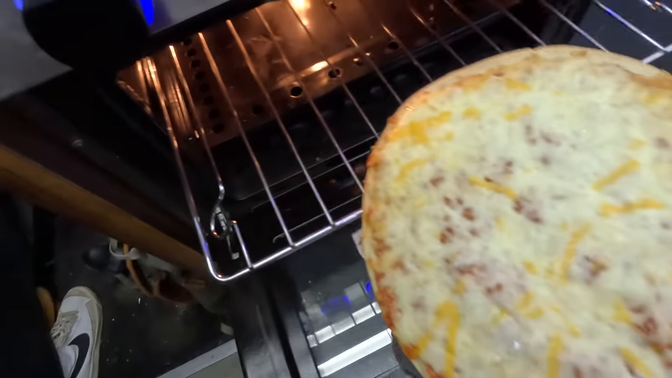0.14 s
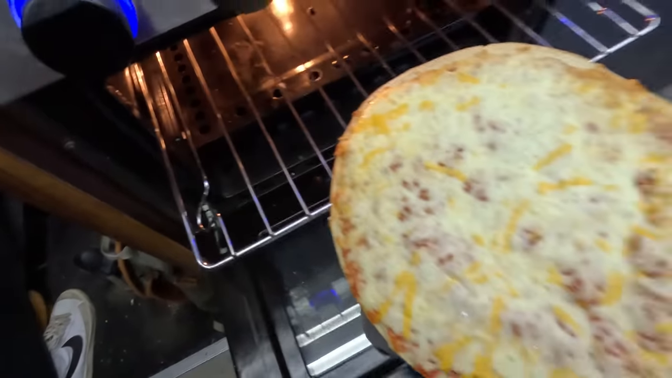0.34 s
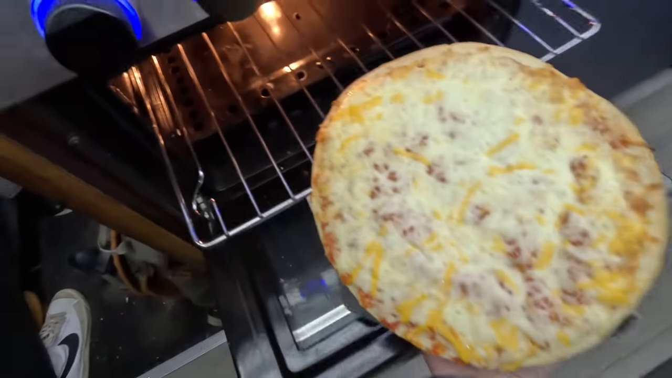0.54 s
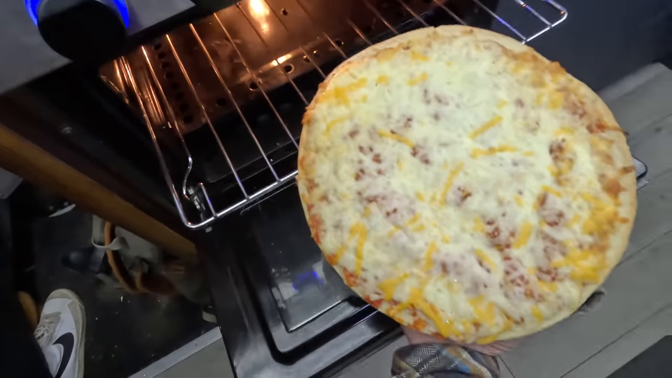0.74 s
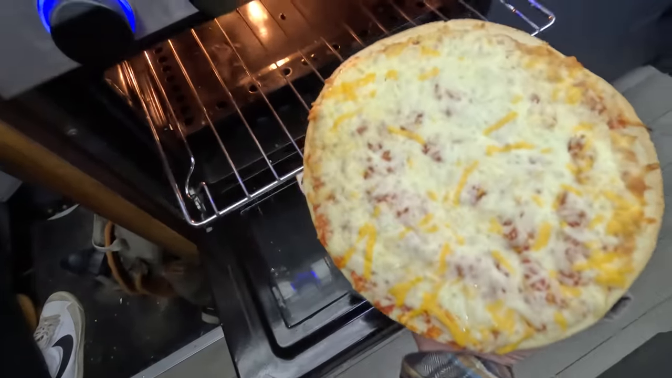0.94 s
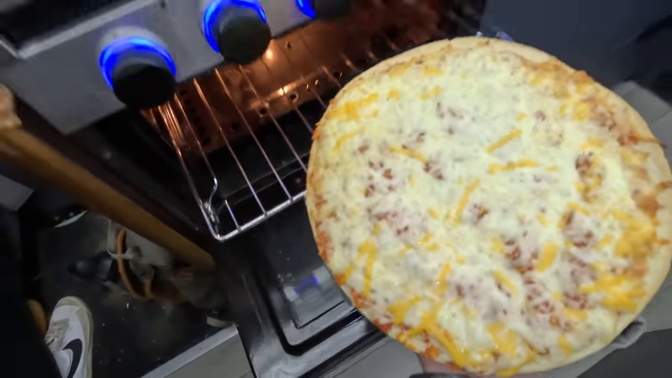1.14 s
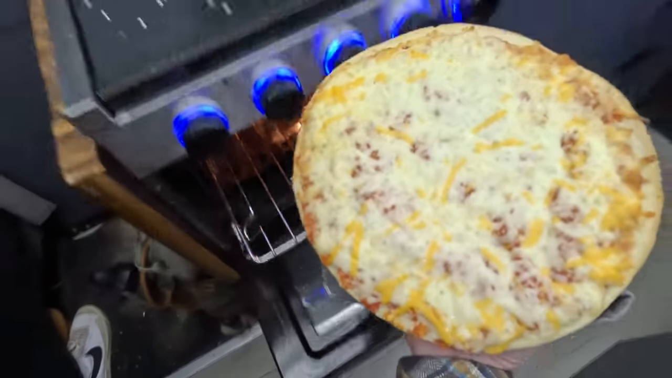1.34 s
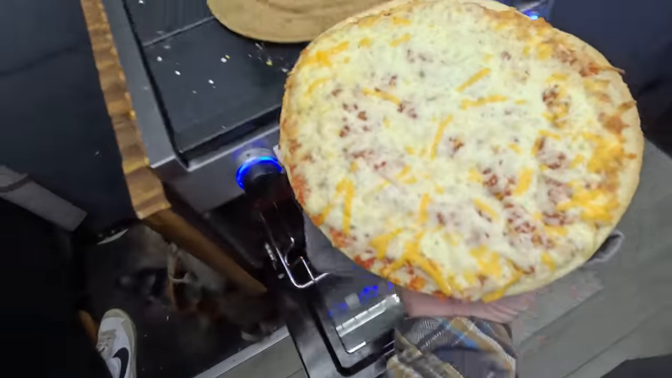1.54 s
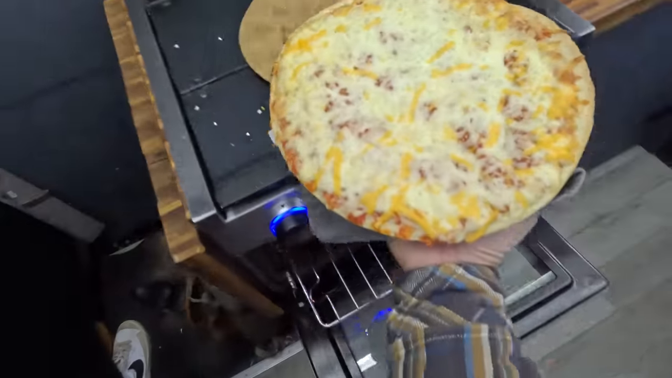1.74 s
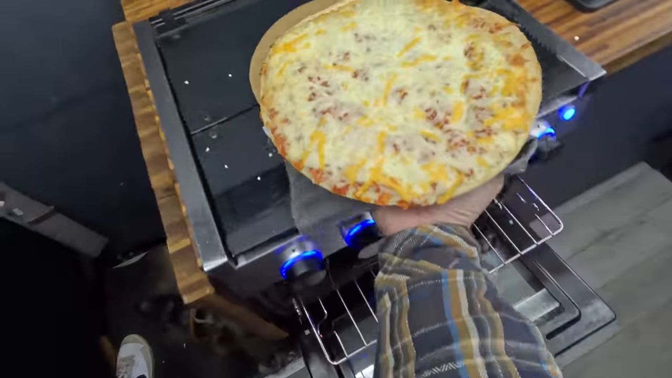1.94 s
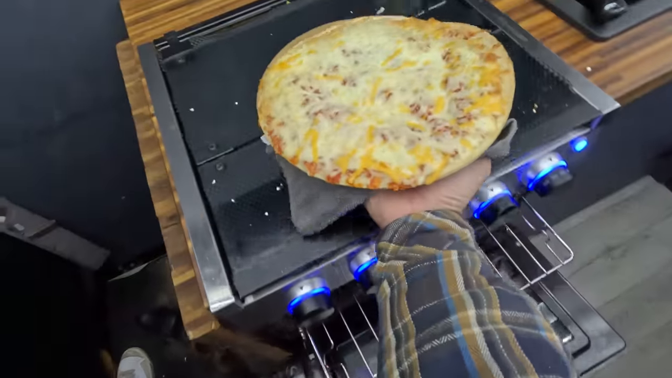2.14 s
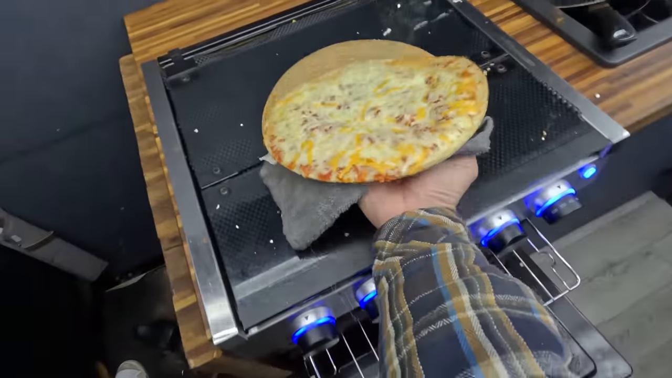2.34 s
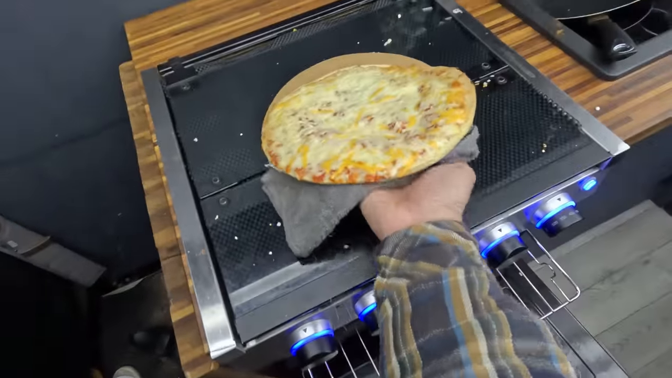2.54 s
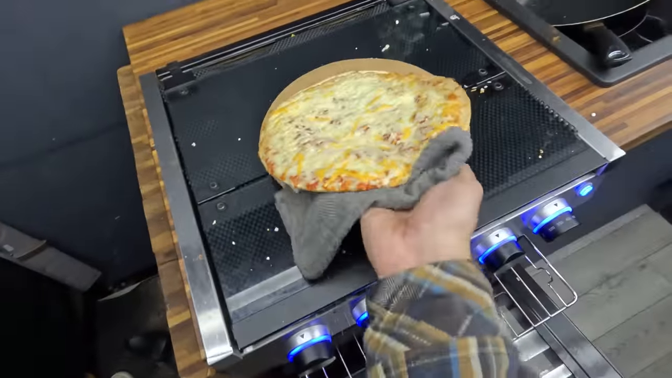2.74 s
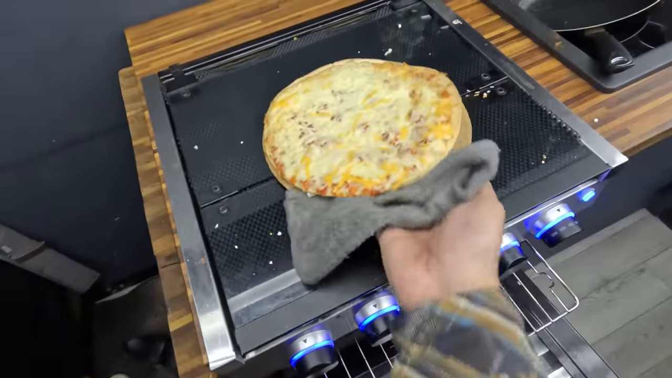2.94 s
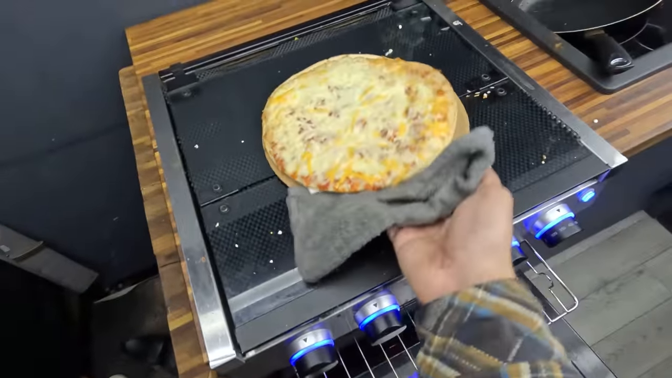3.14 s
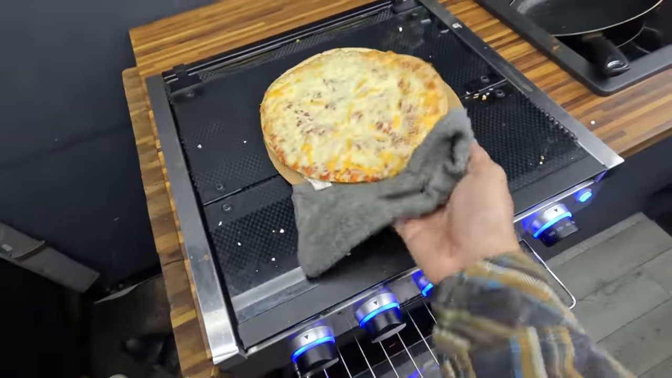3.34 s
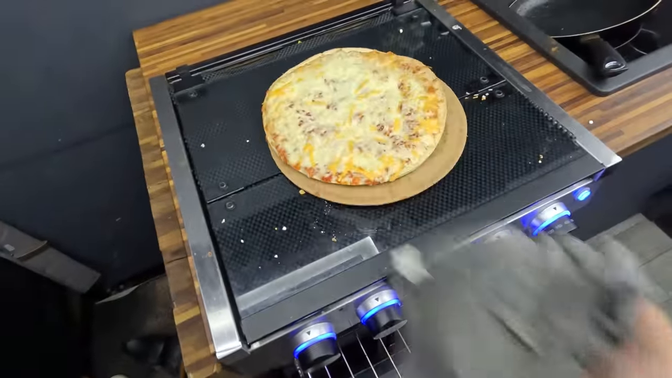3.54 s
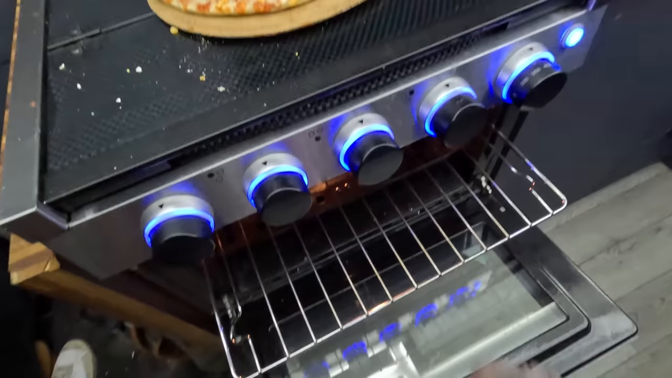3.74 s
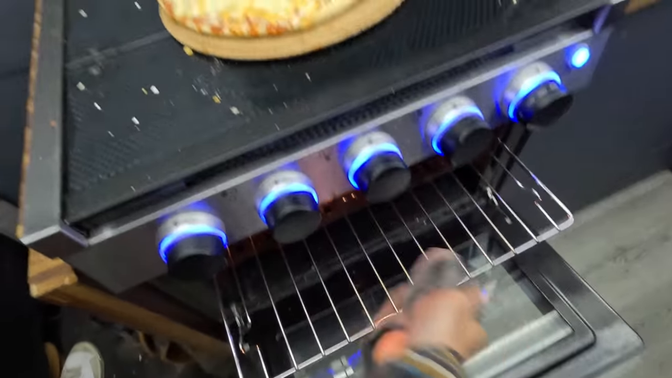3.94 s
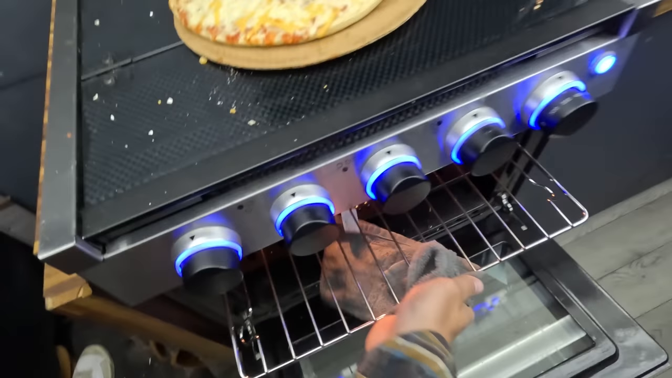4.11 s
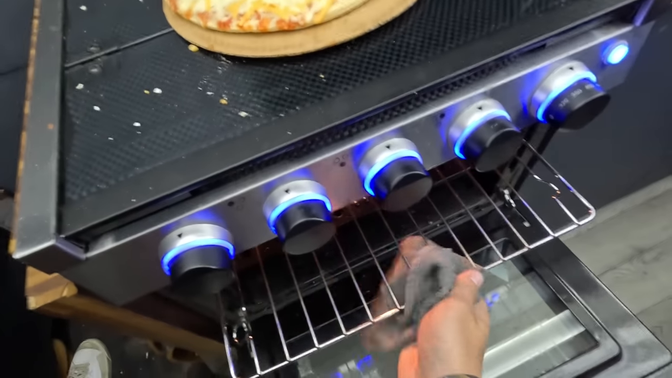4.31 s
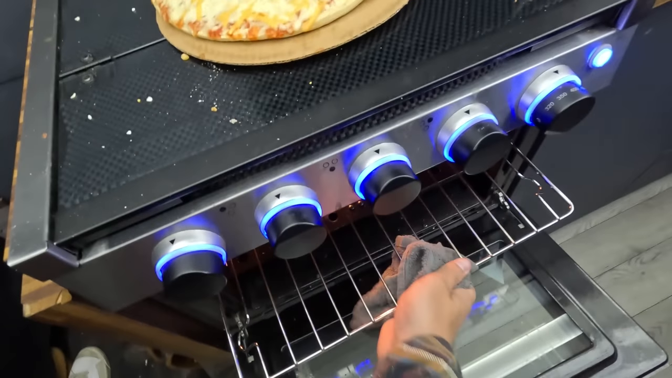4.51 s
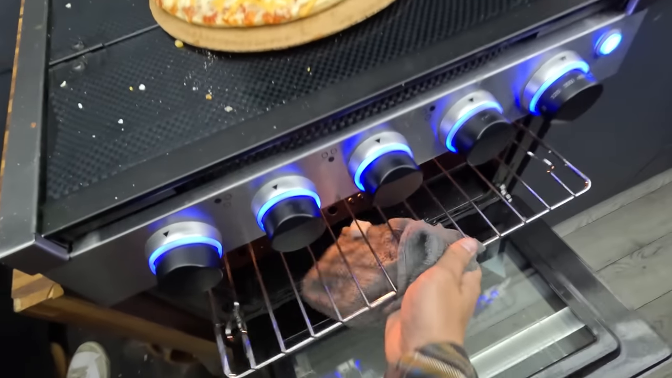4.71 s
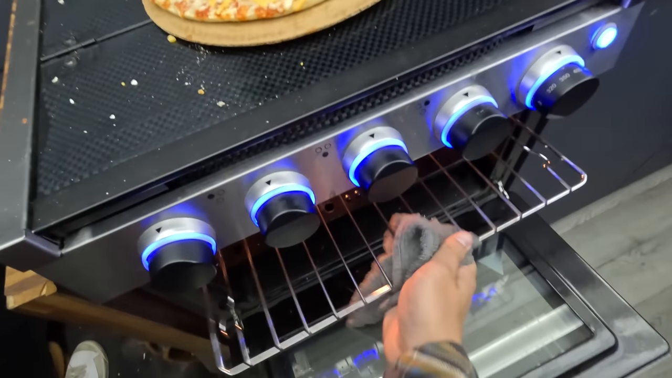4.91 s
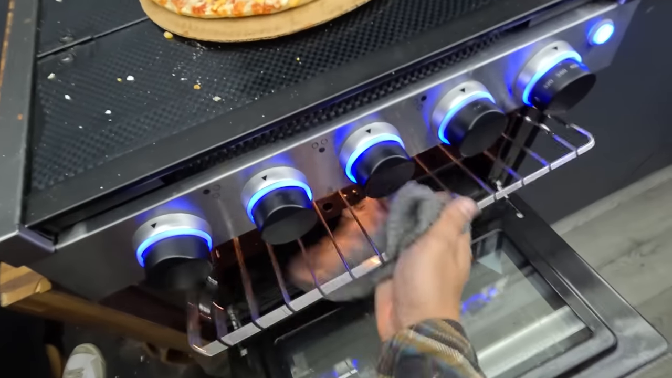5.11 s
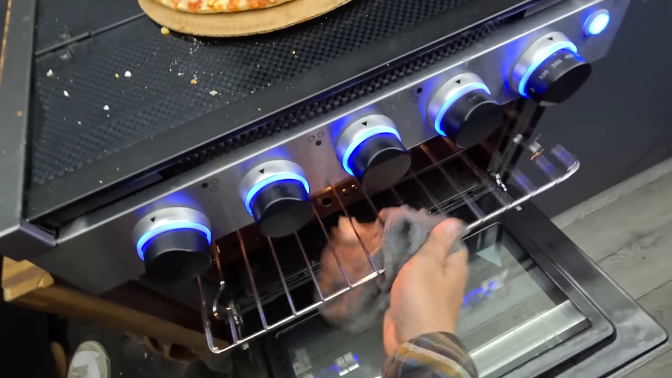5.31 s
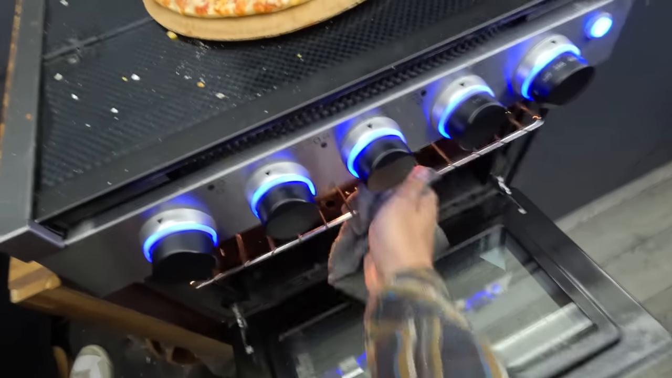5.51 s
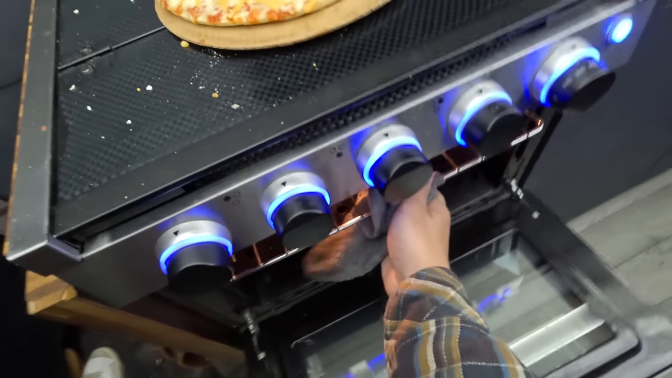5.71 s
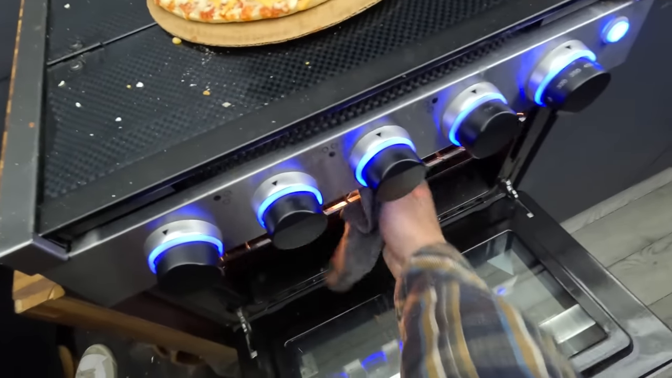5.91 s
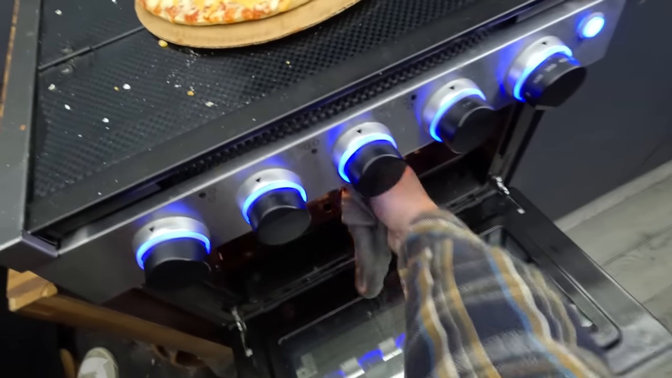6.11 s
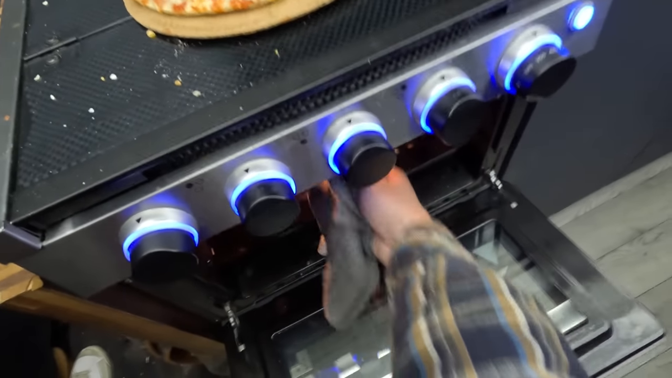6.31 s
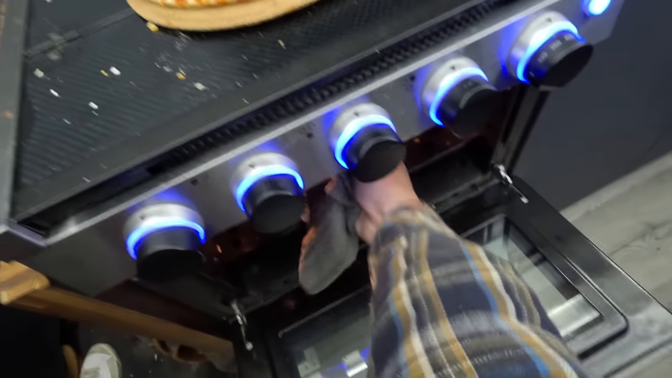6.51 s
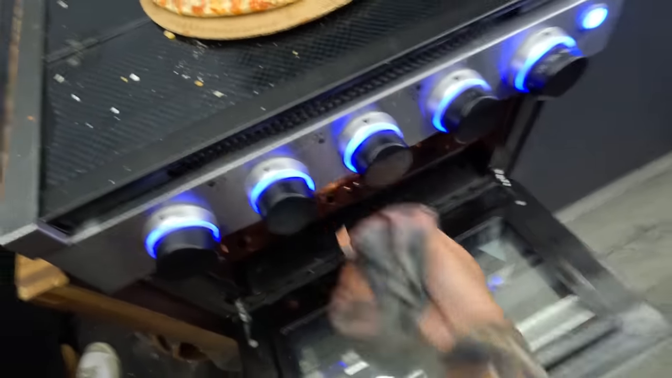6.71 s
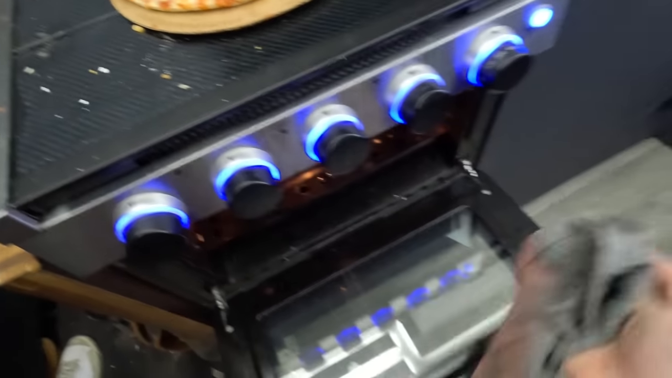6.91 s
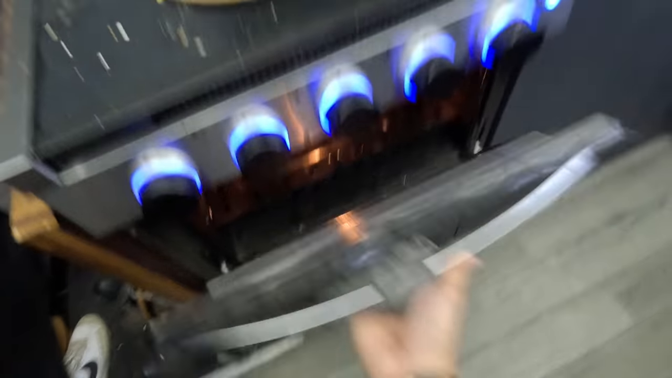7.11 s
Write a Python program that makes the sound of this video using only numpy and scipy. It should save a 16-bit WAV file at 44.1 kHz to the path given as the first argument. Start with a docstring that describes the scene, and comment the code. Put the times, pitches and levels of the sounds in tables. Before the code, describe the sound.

A body-worn microphone picks up a light metallic rattle and sleeve rustle in a small, quiet kitchen. A baking stone knocks down onto a stove cover and rasps along as a cloth is pulled from under it. A loud, bright clatter follows as a wire rack is pushed jerkily into a small steel oven, with hollow booms and panel clanks, ending in a faint metal hum and rustling cloth.

```python
"""A cramped kitchen, with a body-worn microphone close to a small steel oven. A baking stone is set on the
hob cover and scrapes along as a cloth is pulled from under it. Then the wire rack is jolted and shoved
home: its wires clash and ring, the runners chatter, the sheet-metal box booms and the open door clanks.
Cloth rustles near the microphone; behind it lie room tone and the low shaking of the floor."""
import sys
import numpy as np
from scipy import signal
from scipy.fft import rfft, irfft, next_fast_len
from scipy.io import wavfile
from scipy.ndimage import map_coordinates

SR = 44100
rng = np.random.default_rng(int(sys.argv[2]) if len(sys.argv) > 2 else 0)


def wav_out(sig):
    """Save sig, one row per channel (or a flat mono array), as 16-bit PCM at SR to the path in sys.argv[1]."""
    wavfile.write(sys.argv[1], SR, np.round(np.clip(np.atleast_2d(sig).T, -1, 1) * 32767).astype(np.int16))


N = 315396

# Table levels are relative: each source adds its own gain.
# Noise spectra: (frequency [Hz], density [dB])
ROOM_SPECTRUM = [(88, -67), (150, -21), (179, 3.5), (341, 1), (422, -7), (475, -5), (2980, -6.5),
                 (4410, -5), (5910, -7.5), (14800, -14.5), (16000, -50)]
RUMBLE_SPECTRUM = [(12, -33), (30, -14), (70, 0.5), (95, 5), (130, -29.5)]  # floor and oven box
CLOTH_SPECTRUM = [(880, -9.5), (1500, -13.5), (2250, -11.5), (3690, -7.5), (4460, -4.5), (5830, -1.5),
                  (10500, -10), (16000, -39)]
HISS_SPECTRUM = [(1200, -42), (2450, -5), (2900, 3), (3400, 2.5), (6500, 3.5), (9600, 0), (16000, -22.5)]  # scraping stone, treble
RASP_SPECTRUM = [(600, -12.5), (1000, -1.5), (1450, -4), (1950, -2.5), (2350, -3.5), (2800, -23)]  # scraping stone, middle
GRIND_SPECTRUM = [(100, -56), (200, -8), (370, 5), (530, -5), (730, 1), (1000, -21), (1600, -52)]  # scraping stone, bass
STEEL_SPECTRUM = [(710, -16.5), (1200, -14.5), (2060, -13.5), (2790, -3), (3700, -6), (4220, -1), (5240, 0),
                  (8170, -1.5), (13300, -28), (16000, -54)]  # wire contacts
SIZZLE_SPECTRUM = [(6000, -6), (9500, 15), (13000, 3.5), (16000, -6)]  # top of a clash

# Resonances: (frequency [Hz], width [Hz], level [dB])
FLOOR_MODES = [(158, 46, 0)]
COVER_MODES = [(377, 90, 8), (850, 550, 0.5), (1510, 900, -2), (3300, 1240, -1.5), (7500, 7900, -5)]
BOX_MODES = [(229, 41, -10), (285.3, 46, -20)]  # above the box's main note
PANEL_MODES = [(375, 92, 6), (438, 24, 11), (510, 50, -1.5), (617, 55, 3.5), (753, 85, 2.5), (895, 44, 8.5),
               (1128, 70, 4), (1287, 110, 2), (1700, 990, -4.5)]
DOOR_MODES = [(424, 89, 1.5), (547, 74, -3.5), (630, 90, -10), (1166, 180, -11), (1420, 210, -12.5),
              (1880, 490, -18.5)]
LINING_MODES = [
    [(366.6, 6.9, 2), (422, 9.3, 0.5)],
    [(741, 13, 0)],
]  # low and high groups
RUNNER_MODES = [
    [(2550, 220, 0.5), (2710, 150, 3)],
    [(2960, 98, 1.5), (3360, 80, -2)],
    [(3850, 200, -5), (4385, 90, 1), (4800, 230, -2)],
]  # low, middle and high groups

# Free ringing: (frequency [Hz], level [dB], t60 before damping [s])
CAVITY_MODES = [(171, -8, 0.023), (369, -3, 0.08), (647, -3, 0.026), (1220, -21, 0.013), (2110, -19, 0.01)]  # the space under the hob cover
WIRE_MODES = [(1843, -19.5, 0.85), (2050, -26, 0.41), (2265, -12, 0.28), (2490, -20, 0.61),
              (2636, -10.5, 0.3), (2970, -13, 0.62), (3410, -13, 0.6), (3906, -16, 0.85), (3880, -6, 0.2),
              (4105, -5.5, 0.16), (4310, -6.5, 0.42), (4565, -16, 0.28), (4960, -28, 0.9),
              (4990, -21, 0.29), (5115, -14, 0.69), (5390, -13, 0.9), (5584, -10.5, 0.61), (5730, -22, 0.9),
              (6060, -18, 0.3), (6280, -22, 0.46), (6610, -19, 0.43), (6980, -22, 0.45), (7430, -12, 0.12),
              (7450, -19, 0.89), (7780, -21, 0.9), (7980, -29, 0.37), (9050, -20, 0.27), (11000, -30, 0.31)]

# Kitchen reverberation: (frequency [Hz], t60 [s])
ROOM_DECAY = [(200, 0.22), (3000, 0.035), (12000, 0.014)]
# The floor shakes: (time [s], rumble [dB], drone [dB])
FLOOR_LEVELS = [(0.0, -52, -45.5), (0.98, -68, -59.5), (1.41, -67, -75.5), (2.13, -68.5, -75.5),
                (3.09, -66, -65.5), (3.5, -59, -55), (3.94, -67, -76.5), (4.16, -54, -48),
                (4.4, -68, -57.5), (4.98, -40, -28), (5.24, -59.5, -43), (5.73, -85, -47), (6.11, -72, -50),
                (6.59, -80, -34), (6.99, -72, -62), (7.15, -61, -75)]
# Cloth and sleeve movements: (peak time [s], rise [s], fall [s], level [dB])
RUSTLES = [(.55, 0.34, 2.6, -68), (.74, .05, .2, -61), (1.721, 0.98, 1.3, -59), (1.961, 0.033, 0.042, -45),
           (2.1, 0.23, 0.46, -65.5), (2.59, 0.13, 0.15, -50.5), (3.621, .21, 1.3, -73),
           (3.871, 0.098, .4, -65), (4.02, .15, .1, -55), (4.4, 0.99, 0.27, -48), (6.73, 0.058, 1.07, -47),
           (6.96, 0.59, 0.77, -59)]
# Knocks on the hob cover: (time [s], level [dB], t60 [s], brightness [Hz], hollow tap [dB])
COVER_KNOCKS = [(.638, -47, 0.016, 1000, -55), (1.418, -47, 0.045, 1550, -57),
                (1.953, -38.5, 0.049, 2920, -76), (2.407, 1.5, 0.0069, 1750, -24),
                (2.4198, -22.5, 0.016, 600, -24), (2.438, -12.5, 0.11, 6200, -48),
                (2.62, -23, 0.034, 2010, -30), (3.045, -30, 0.014, 1900, -33.5),
                (3.14, -24.5, 0.27, 6800, -38), (3.4279, -20, 0.02, 1490, -23.5),
                (3.479, -30, 0.03, 725, -46), (3.584, -34.5, 0.04, 6200, -64), (3.66, -42, 0.03, 5900, -62),
                (3.99, -48, .05, 2500, -43)]
# Scrapes: (peak time [s], rise [s], fall [s], stop after peak [s], hiss [dB], rasp [dB], grind [dB])
STONE_STROKES = [(2.411, .009, 0.042, .052, -30, -50, -41), (2.431, 0.042, 0.4, 0.094, -34, -47.5, -55),
                 (2.628, 0.0091, 0.72, 0.077, -46, -41.5, -60), (2.698, 0.15, 0.32, 0.097, -43, -53, -51),
                 (2.851, 0.025, .3, 0.018, -38, -48.5, -55),
                 (2.868, 0.014, 0.28, 0.11, -27.5, -40.5, -49.5),
                 (3.042, 0.65, 0.098, 0.023, -50.5, -54.5, -58),
                 (3.099, 0.028, 0.16, 0.055, -52.5, -54, -47), (3.159, 0.057, 0.15, 0.058, -38, -44, -50),
                 (3.258, 0.099, 0.26, .051, -63, -61, -53), (3.321, 0.066, 0.44, 0.11, -35, -40.5, -51),
                 (3.44, 0.01, 0.06, 0.044, -43, -54, -47), (3.452, 0.0056, 0.032, 0.011, -30.5, -51, -54),
                 (3.482, 0.029, 0.033, 0.016, -28.5, -37.5, -32.5), (3.576, 0.1, 1, 0.25, -59, -59, -58)]
# The lining hums on when nothing holds it, a table per spell: (time [s], low note [dB], high note [dB])
LINING_HUM = [
    [(0.35, -48, -58), (0.558, -63.5, -67), (1.072, -73, -79), (1.228, -76, -100)],
    [(4.12, -52, -43), (4.196, -52.5, -50), (4.348, -50.5, -55), (4.46, -60, -66)],
    [(6.58, -43, -51), (6.64, -43.5, -52.5), (6.886, -54.5, -55), (7.0, -55, -64), (7.15, -67, -81)],
]
# The box shudders as the rack settles: (time [s], boom [dB], door clank [dB])
BOX_SHUDDER = [(0.0, -42, -50), (.08, -42, -39), (.11, -37, -36.5), (.14, -36, -37), (0.208, -27, -39),
               (0.326, -25.5, -47.5), (0.344, -26, -47.5), (0.458, -55, -71), (0.5, -56, -55)]
# Jolts of the box: (time [s], boom [dB], note [Hz], fall [s], panel clank [dB], rumble [dB])
BOX_JOLTS = [(1.421, -49, 158, 0.065, -63, -52), (2.407, -46, 168, 0.09, -66, -55),
             (2.621, -63, 233, 0.091, -59, -69), (3.048, -42, 197.6, 0.037, -41.5, -47),
             (3.33, -54, 199, 0.13, -55, -63), (3.427, -41.5, 185, 0.1, -40.5, -39),
             (3.5, -43, 213, .12, -44.5, -42), (4.034, -20.5, 194.9, 0.14, -34, -39),
             (4.072, -8.5, 179.4, 0.075, -25, -43.5), (4.118, -44, 188, 0.22, -35, -41),
             (4.31, -41, 167.5, 0.039, -49, -53), (4.429, -37, 165, .12, -73, -59),
             (4.49, -24, 194, 0.049, -40, -45), (4.514, -18, 187.5, 0.042, -33.5, -44),
             (4.556, -37.5, 190.6, 0.21, -40.5, -45), (4.648, -15.5, 187.4, 0.11, -24.5, -47),
             (4.71, -33, 199.9, 0.26, -31.5, -52), (4.803, -11.5, 184.5, 0.16, -33, -43),
             (4.835, -11, 187.8, 0.077, -26.5, -34), (4.886, -13.5, 202.4, 0.15, -20, -34),
             (4.905, -28, 212, 0.11, -36, -40), (4.938, -7.5, 189.6, 0.082, -23.5, -41),
             (5, -5.5, 184.4, 0.079, -34, -23), (5.081, -16.5, 188.6, 0.036, -26, -39),
             (5.102, -15, 187.9, 0.15, -31.5, -31), (5.19, -27.5, 176.3, 0.17, -42, -55),
             (5.235, -33, 203.1, 0.26, -51, -53), (5.282, -28.5, 185.4, 0.21, -45, -59),
             (5.393, -28.5, 193.8, 0.1, -40.5, -52.5), (5.477, -34, 193.8, 0.066, -55, -62),
             (5.532, -31.5, 216.4, 0.12, -45, -66), (5.563, -29, 188.1, 0.15, -43, -57),
             (5.65, -48, 231, 0.27, -43, -64), (5.741, -48, 196, 0.96, -45.5, -72),
             (5.878, -40, 233.8, 0.18, -36.5, -54.5), (5.918, -36, 227, 0.36, -54, -58),
             (5.993, -30, 200.4, 0.11, -52, -40), (6.026, -19.5, 193, 0.14, -33, -52),
             (6.11, -54, 179.7, 0.21, -37, -62), (6.193, -41, 241.3, 0.71, -43.5, -72),
             (6.276, -39.5, 222.4, 0.82, -42.5, -68), (6.36, -48, 230.4, 0.22, -40.5, -60),
             (6.43, -27.5, 229.5, 0.23, -35, -45), (6.513, -19.5, 192.2, 0.13, -27.5, -37),
             (6.551, -24, 235.3, 0.2, -37, -60), (6.702, -50, 213.3, 0.14, -54, -68),
             (6.789, -36, 143.8, 0.11, -63, -65), (6.9, -42, 147.3, 0.13, -65, -69),
             (6.99, -42, 139, 0.11, -70, -66), (7.06, -42.5, 139.2, 0.18, -74, -70.5)]
# Rack sliding, a table per push: (time [s], chatter [dB], low ring [dB], middle ring [dB], high ring [dB])
RACK_PUSHES = [
    [(0.0, -61, -64, -84, -74), (0.13, -45, -60, -70, -67), (0.326, -59.5, -60, -66, -61),
     (0.42, -70, -81, -84, -78)],
    [(4.03, -54, -65, -73, -80), (4.076, -56, -65, -68, -65), (4.192, -42, -50, -42, -41),
     (4.282, -50, -61, -70, -62), (4.476, -55, -90, -93.5, -62), (4.524, -19, -44, -31, -35),
     (4.64, -46.5, -52, -48, -58)],
    [(4.641, -39, -40, -49, -55), (4.977, -48, -54, -40, -29), (5.201, -40, -68, -67, -43.5),
     (5.389, -31.5, -66, -69, -41), (5.561, -26, -44, -31.5, -25), (5.719, -47, -41.5, -47, -31),
     (5.876, -49, -63, -46, -48.5)],
    [(5.877, -49, -42, -35, -37.5), (5.979, -40.5, -78, -72, -45), (6.07, -24, -43, -33, -49),
     (6.18, -46, -56, -47, -37), (6.26, -50, -43, -41, -37.5), (6.35, -49, -37, -54, -39),
     (6.467, -32, -57, -35, -58), (6.56, -33, -39, -35.5, -44), (6.637, -48, -50, -48, -54),
     (6.75, -60, -70, -70, -51)],
]
# Wire clashes: (time [s], level [dB], brightness [Hz], t60 [s], box thump [dB], sizzle [dB], ring [dB])
RACK_CLASHES = [(0.066, -32, 2650, 0.18, -25, -10, -30), (0.094, -36, 6200, 0.1, -30, -11, -25),
                (0.1347, -25.5, 2730, 0.14, -41, -18, -21), (0.151, -30, 2740, 0.21, -42, -10, -18),
                (0.1986, -38.5, 3300, 0.26, -43, -1, -13), (4.028, -10, 6880, 0.25, -35, -10.5, -21),
                (4.069, 2, 4640, 0.18, 0, -11, -28), (4.093, -1, 6700, 0.06, -28, -22, -31),
                (4.124, -16, 7200, 0.076, -11, -22, -16.5), (4.224, -23, 4730, 0.12, -32.5, -48, -19),
                (4.3, -28, 4840, 0.074, -46, -15, -53), (4.421, -24.5, 6200, 0.3, -30, -12, -39),
                (4.466, 4, 8500, 0.099, -33, -31, -28), (4.5026, -1, 6200, 0.091, -18, -11, -45),
                (4.511, 5.5, 4450, 0.061, -42, -14, -34), (4.64, 3, 4200, 0.11, -16, -10.5, -29),
                (4.6529, -1.5, 4300, 0.085, -16, -24, -47), (4.6897, -4.5, 4027, 0.19, -52, -13.5, -56),
                (4.73, -7.5, 3780, 0.2, -47, -15.5, -37), (4.7893, -2, 5020, 0.13, -4.5, -18, -36),
                (4.8188, -4, 5340, 0.088, -9, -17, -25), (4.8372, -1, 5000, 0.11, -13, -21, -47),
                (4.881, 3.5, 4690, 0.14, -8, -17, -53), (4.897, -2.5, 5100, 0.16, -30, -33, -42),
                (4.9222, 1.5, 5050, 0.11, -7, -23, -29.5), (4.934, -1.5, 5260, 0.076, -26, -25, -30),
                (4.9619, 1, 4520, 0.11, -15, -25, -34), (4.994, 1.5, 5600, 0.22, -28, -48, -55),
                (5.069, 4, 4772, 0.19, -17, -19, -31.5), (5.107, 0.5, 5230, 0.11, -28, -27, -36),
                (5.1143, 3, 6600, 0.081, -27, -37, -29), (5.1325, 1.5, 6570, 0.15, -15, -22, -35),
                (5.1824, -4, 6440, 0.14, -15.5, -28, -54), (5.2495, 1, 7680, 0.12, -41, -14, -58),
                (5.2996, -12, 5310, 0.11, -46, -10, -46), (5.326, -13, 5300, 0.07, -48, -16, -29),
                (5.3912, -1, 4660, 0.11, -18, -16, -47), (5.4186, 1, 4570, 0.12, -22, -20, -26),
                (5.432, 2, 6035, 0.077, -36, -30, -32), (5.4751, -2.5, 4850, 0.24, -27, -14.5, -53),
                (5.5148, -3.5, 6070, 0.21, -61, -17, -35), (5.5289, -2, 6100, 0.073, -19.5, -14, -39),
                (5.557, -3.5, 7800, 0.19, -27, -12, -18.5), (5.591, -1.5, 5150, 0.11, -56, -13, -33),
                (5.609, -2.5, 5060, 0.19, -56, -16, -44), (5.6382, -8.5, 4800, 0.36, -19, -14, -31),
                (5.686, -13, 5700, 0.26, -37, -11, -19), (5.879, -21, 5840, 0.36, -20.5, -41, -22),
                (5.9851, 2.5, 5560, 0.11, -51, -18, -37), (6.0041, -0.5, 3767, 0.17, -44, -10, -24.5),
                (6.0271, -2.5, 5040, 0.4, -23, -13, -40), (6.0623, -1.5, 4600, 0.093, -51, -13, -39),
                (6.128, -16.5, 5500, 0.6, -46, -13, -37), (6.18, -21, 5950, 0.16, -50, -10, -16),
                (6.268, -28, 4260, 0.15, -50, -25, -8), (6.358, -10.5, 4500, 0.092, -21, -22, -24),
                (6.4357, -15, 3300, 0.15, -15, -19, -29), (6.4502, -4.5, 3450, 0.22, -17, -13.5, -36),
                (6.4987, -3, 5100, 0.15, -16, -7.5, -22), (6.5178, -6, 3930, 0.23, -31, -14, -22)]


def amp(db):
    """dB to gain."""
    return 10 ** (np.asarray(db) / 20)


def unit(x):
    """Scaled to rms 1."""
    return x / np.sqrt(np.mean(x ** 2) + 1e-20)


def along(points, hz):
    """Interpolates (frequency, value) points on a log axis."""
    freqs, values = np.transpose(points)
    return np.interp(np.log(hz + 1), np.log(freqs + 1), values)


def column(tables, index):
    """One level in dB per sample from a column of successive tables; silent outside them."""
    t, db = np.arange(N) / SR, np.full(N, -200.0)
    for rows in map(np.array, tables):
        inside = (t >= rows[0, 0]) & (t <= rows[-1, 0])
        db[inside] = np.interp(t[inside], rows[:, 0], rows[:, index])
    return db


def gains(*tables):
    """A gain curve for each level column."""
    return [amp(column(tables, index)) for index in range(1, len(tables[0][0]))]


def swells(peak_s, rise_s, fall_s, *levels_db, stop_s=np.inf):
    """A gain curve per list of levels: events climb 30 dB in rise_s and sink 30 dB in fall_s."""
    t = np.arange(0, N / SR + .001, .001)
    after = t - np.c_[peak_s]
    drop = np.maximum(-after / np.c_[rise_s], after / np.c_[fall_s])
    drop += np.maximum(after - np.c_[stop_s], 0) / 0.082  # once stopped, 30 dB more every 82 ms
    powers = [amp(2 * db) @ amp(-60 * drop) for db in levels_db]
    return [np.interp(np.arange(N) / SR, t, np.sqrt(power)) for power in powers]


def wobble(rate):
    """A smooth random curve, rate knots a second."""
    return map_coordinates(rng.standard_normal(int(N * rate / SR) + 4), [np.arange(N) * rate / SR])


def grainy(n, grain_db, rate):
    """Noise whose size jumps rate times a second, as in many tiny contacts."""
    sizes = np.minimum(rng.exponential(size=int(n * rate / SR) + 2), 3)
    grain = (np.arange(n) * rate / SR).astype(int)
    return unit(rng.standard_normal(n) * amp(grain_db * sizes)[grain])


def filtered(x, response):
    """x times a complex response of frequency."""
    size = next_fast_len(len(x) + 4096, True)
    return irfft(rfft(x, size) * response(np.fft.rfftfreq(size, 1 / SR)), size)[:len(x)]


def resonances(modes):
    """Causal response of a sum of resonances."""
    return lambda f: sum((-1) ** k * amp(db) * 1j * f * width / (hz * hz - f * f + 1j * f * width)
                         for k, (hz, width, db) in enumerate(modes))


def resonated(x, modes):
    """x through resonances, rms 1."""
    return unit(filtered(x, resonances(modes)))


def coloured(x, spectrum):
    """x given a spectrum, rms 1."""
    return unit(filtered(x, lambda f: amp(along(spectrum, f))))


def add(track, s, x):
    """Mixes x into track from time s."""
    part = track[round(s * SR):][:len(x)]
    part += x[:len(part)]


def ringing(modes, t, longest_s, detune, scatter_db, throb, beat_spread_hz=20):
    """One blow's ring: modes vary in strength and pitch, and can throb as close pairs do."""
    hz, db, t60 = np.transpose(modes)
    shift, phase, strength, beat_rate, beat_phase = rng.standard_normal((5, len(modes), 1))
    tones = np.sin(2 * np.pi * hz[:, None] * (1 + detune * shift) * t + np.pi * phase)
    decay = amp(-60 * t / np.minimum(t60, longest_s)[:, None])
    beat = 1 + throb * np.sin(2 * np.pi * beat_spread_hz * beat_rate * t + np.pi * beat_phase)
    fade = np.minimum(t / .002, 1) * np.minimum((t[-1] - t) / .1, 1)
    return fade * (amp(db + scatter_db * strength[:, 0]) @ (tones * decay * beat))


def room_tone(level_db=-65.5, waver_db=2.2):
    """The kitchen's quiet bed of noise, wavering slowly."""
    return amp(level_db + waver_db * wobble(3)) * coloured(rng.standard_normal(N), ROOM_SPECTRUM)


def room_reverb(x):
    """The close walls answer briefly, the treble dying first."""
    hz, t, noise = signal.stft(rng.standard_normal(SR // 2), SR, nperseg=256)
    decay = amp(-60 * t / along(ROOM_DECAY, hz)[:, None])
    tail = signal.istft(noise * decay, SR, nperseg=256)[1]
    return signal.fftconvolve(np.pad(x, (150, 0)), tail / np.linalg.norm(tail))[:N]


def floor_shake():
    """Underfoot, the floor shakes with a deep rumble and a low drone."""
    deep, drone = gains(FLOOR_LEVELS)
    rumble = deep * coloured(rng.standard_normal(N), RUMBLE_SPECTRUM)
    return rumble + drone * resonated(rng.standard_normal(N), FLOOR_MODES)


def cloth_rustle():
    """Cloth and sleeves rub in grainy swells near the microphone."""
    level = swells(*np.transpose(RUSTLES))[0] * amp(0.5 * wobble(58))
    return level * coloured(grainy(N, 1.7, 570), CLOTH_SPECTRUM)


def cover_knocks():
    """The stone and smaller knocks sound the hob cover and the hollow under it."""
    blows, taps, t = np.zeros(N), np.zeros(N), np.arange(SR // 8) / SR
    for s, db, t60, bright_hz, tap_db in COVER_KNOCKS:
        push = amp(-14.5 - 60 * t / t60) * rng.standard_normal(len(t))
        push[0] = 1
        push = filtered(push, resonances([(bright_hz, 0.62 * bright_hz, 0)]))  # harder is brighter
        add(blows, s + 0.0003, amp(db + 5.5) * push / np.abs(push).max())
        hollow = ringing(CAVITY_MODES, t, longest_s=.07, detune=.03, scatter_db=1, throb=0)
        add(taps, s, amp(tap_db + 1.5) * hollow)
    return filtered(blows, resonances(COVER_MODES)) + taps


def stone_scrape():
    """Gritty contacts under the stone hiss, rasp and grind as it crosses the cover."""
    peak_s, rise_s, fall_s, stop_s, *levels_db = np.transpose(STONE_STROKES)
    hiss, rasp, grind = swells(peak_s, rise_s, fall_s, *levels_db, stop_s=stop_s)
    coarse, fine = grainy(N, 3.9, 300), grainy(N, 2.1, 1200)
    return (hiss * coloured(fine, HISS_SPECTRUM) + rasp * coloured(coarse, RASP_SPECTRUM)
            + grind * coloured(coarse, GRIND_SPECTRUM))


def lining_hum():
    """The oven's lining trembles on a low and a high note."""
    tremor = rng.standard_normal(N)
    return sum(level * resonated(tremor, modes) for level, modes in zip(gains(*LINING_HUM), LINING_MODES))


def box_jolts(rise_s=0.008, clank_lead_s=0.0057, shudder_hz=179.4):
    """Gains of boom, clank and rumble, and the box's note, which each jolt sets anew."""
    s, boom_db, hz, fall, clank_db, deep_db = np.transpose(BOX_JOLTS)
    peak, rise = s + rise_s / 2, np.full(len(s), rise_s)
    boom, = swells(peak, rise, fall, boom_db)
    clank, = swells(peak - clank_lead_s, rise / 2, fall, clank_db)
    deep, = swells(peak, rise, fall * 0.69, deep_db)
    jolts_so_far = np.searchsorted(peak - rise, np.arange(N) / SR)
    return boom, clank, deep, np.r_[shudder_hz, hz][jolts_so_far]


def oven_box(thumps):
    """The sheet-metal box booms on one wavering note; its panels and open door clank along."""
    boom, clank, deep, pitch = box_jolts()
    shudder, door = gains(BOX_SHUDDER)
    pitch = pitch * (1 + 0.0162 * wobble(30))
    note = (boom + shudder) * np.sin(2 * np.pi * np.cumsum(pitch) / SR) * amp(0.7 * wobble(35))
    upper = (amp(-9.5) * boom + amp(-19) * shudder) * resonated(grainy(N, 0.83, 33), BOX_MODES)
    knocking = grainy(N, 1.13, 200)
    clanks = clank * resonated(knocking, PANEL_MODES) + door * resonated(knocking, DOOR_MODES)
    hum = lining_hum()
    rumble = deep * coloured(rng.standard_normal(N), RUMBLE_SPECTRUM)
    return note + upper + clanks + hum + rumble + filtered(thumps, resonances(BOX_MODES))


def rack_slide():
    """Wires chatter along the runners, which ring roughly and unevenly."""
    chatter, *rings = gains(*RACK_PUSHES)
    grit = grainy(N, 2.4, 600)
    tones = sum(level * amp(2.5 * wobble(18)) * resonated(grit, modes)
                for level, modes in zip(rings, RUNNER_MODES))
    return chatter * amp(1.8 * wobble(40)) * coloured(grit, STEEL_SPECTRUM) + tones


def struck_patch(bright_hz, reach_octaves=0.61, spread_db=6, width_hz=110, plain_share=.4):
    """Response of a patch of gripped wires: broad notes near bright_hz over plain steel colour."""
    wire_hz = np.transpose(WIRE_MODES)[0]
    distance = np.log2(wire_hz / bright_hz) / reach_octaves
    struck_db = 2 + spread_db * rng.standard_normal(len(wire_hz)) - 6 * distance ** 2
    patch = [(bright_hz, 0.07 * bright_hz, 2.5)]
    patch += [(hz, width_hz, db) for hz, db in zip(wire_hz, struck_db) if db > -6]
    return lambda f: amp(along(STEEL_SPECTRUM, f)) * (plain_share + np.abs(resonances(patch)(f)))


def rack_clashes():
    """Close up, bursts of tiny wire contacts ring the rack; also returns their thumps on the box."""
    steel, thumps = np.zeros(N), np.zeros(N)
    t, ring_t = np.arange(SR // 5) / SR, np.arange(SR // 2) / SR
    attack = 1 - np.exp(-t / 0.00049)
    for s, db, bright_hz, t60, thump_db, sizzle_db, ring_db in RACK_CLASHES:
        patch = struck_patch(bright_hz)
        contacts = grainy(len(t), 0.18, 760)
        burst = amp(-60 * t / t60) * unit(filtered(contacts, patch))
        sizzle = amp(sizzle_db + 3 - 60 * t / (0.66 * t60)) * coloured(contacts, SIZZLE_SPECTRUM)
        add(steel, s, amp(db - 12) * attack * (burst + sizzle))
        # the grip shifts and damps the wires; held loosely, they ring
        ring = ringing(WIRE_MODES, ring_t, longest_s=.5, detune=0.002, scatter_db=2, throb=.85)
        add(steel, s, amp(db + ring_db) * ring)
        add(thumps, s + 0.0021, amp(thump_db + 19) * np.hanning(60))
    return steel, thumps


def scene():
    """The mono mix at the microphone; the room answers the rack and the stone."""
    steel, thumps = rack_clashes()
    direct = steel + rack_slide() + cover_knocks() + stone_scrape()
    foreground = direct + amp(-15) * room_reverb(direct) + oven_box(thumps)
    return (foreground + cloth_rustle() + floor_shake() + room_tone())[None]


def record(dry, top_hz=15900):
    """The microphone chain rounds off peaks at full scale and passes nothing above top_hz."""
    soft = dry[0] / (1 + np.abs(dry[0]) ** 6) ** (1 / 6)
    return filtered(soft, lambda hz: hz < top_hz)[None]


dry = scene()
out = record(dry)
wav_out(out)
```